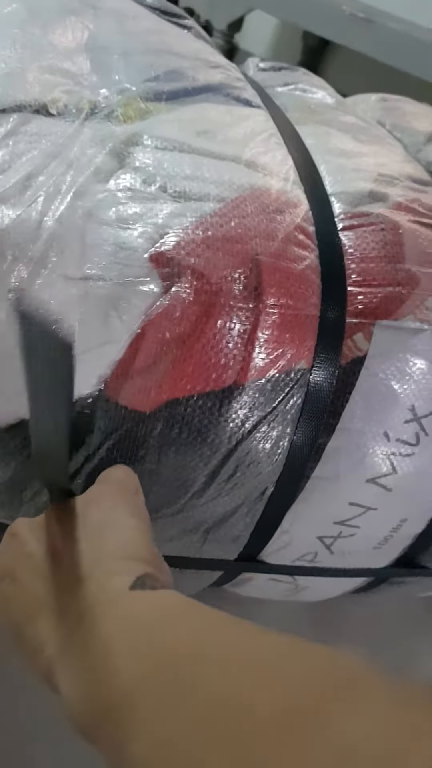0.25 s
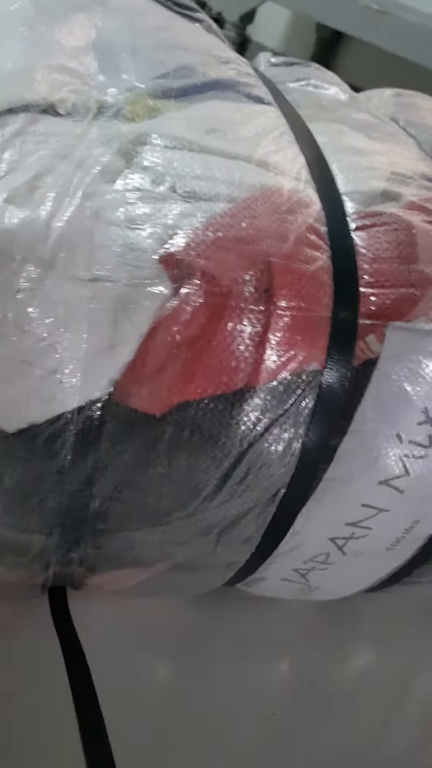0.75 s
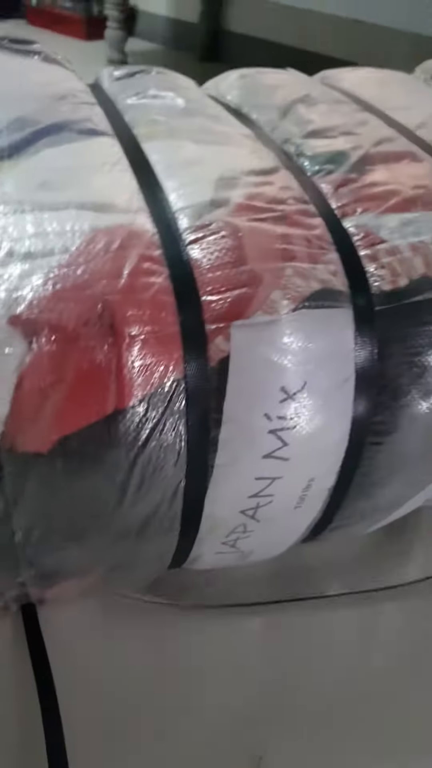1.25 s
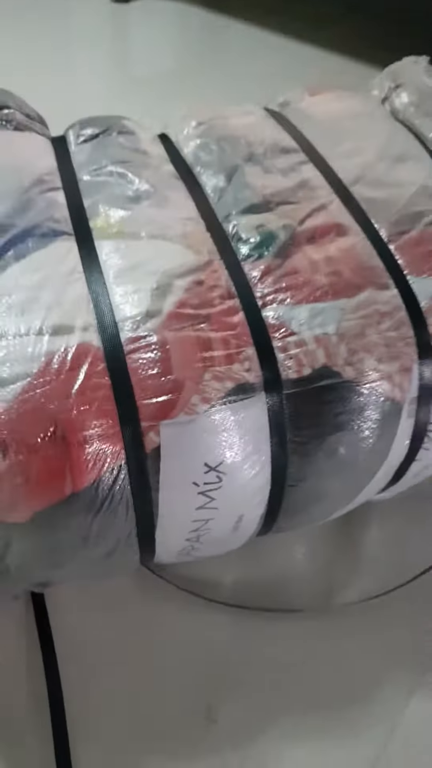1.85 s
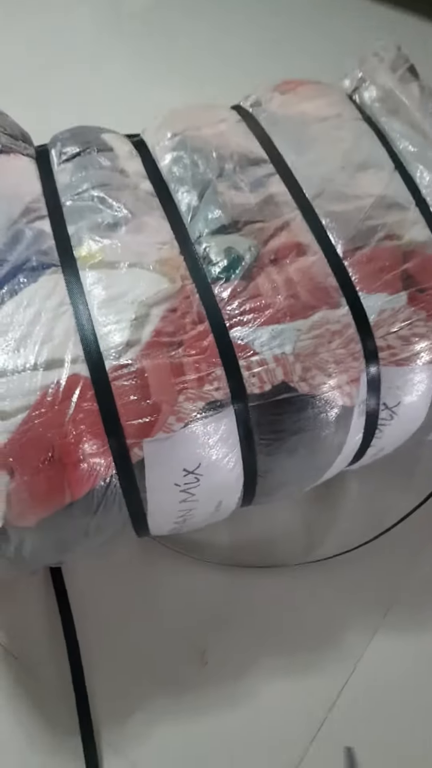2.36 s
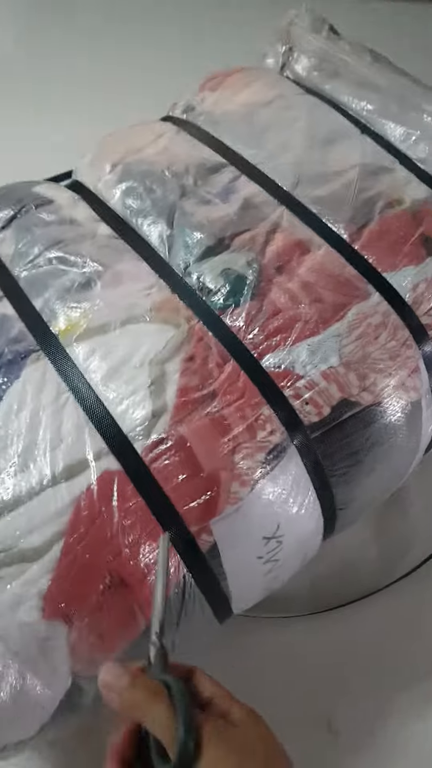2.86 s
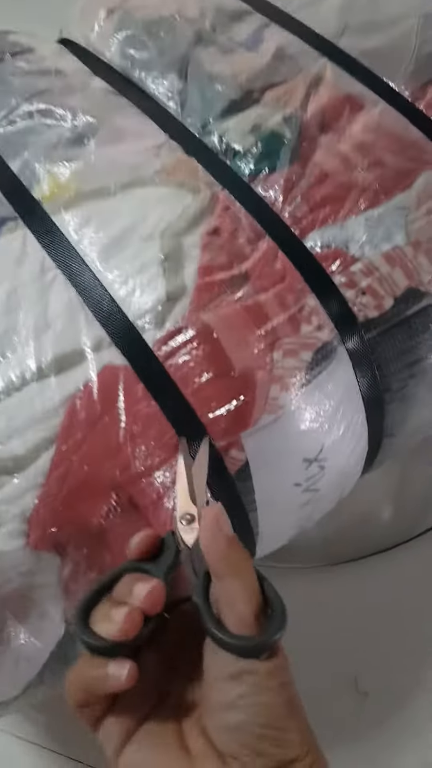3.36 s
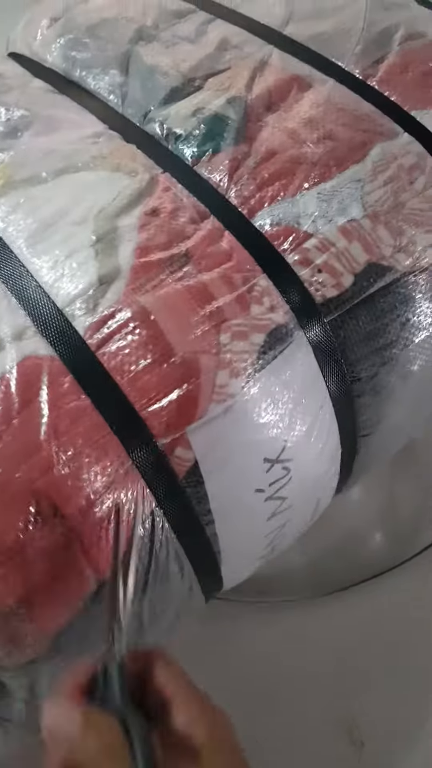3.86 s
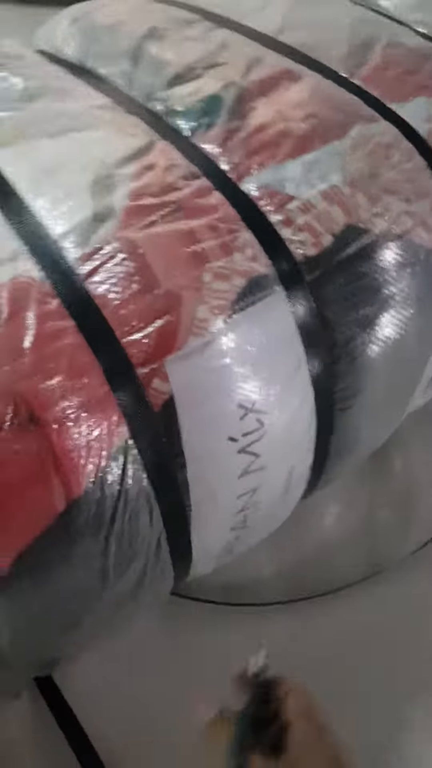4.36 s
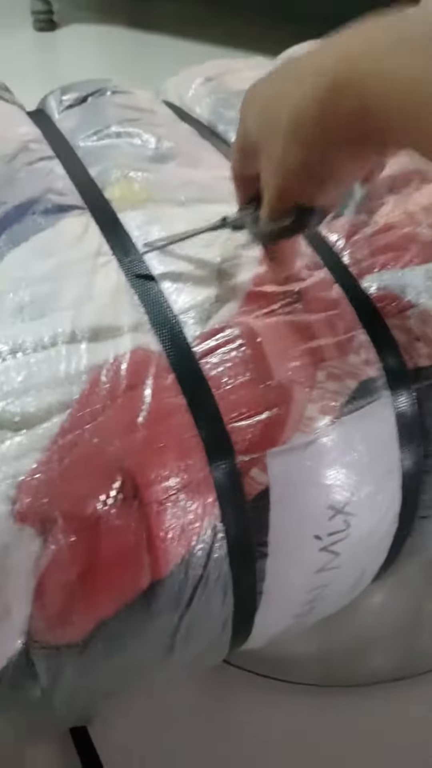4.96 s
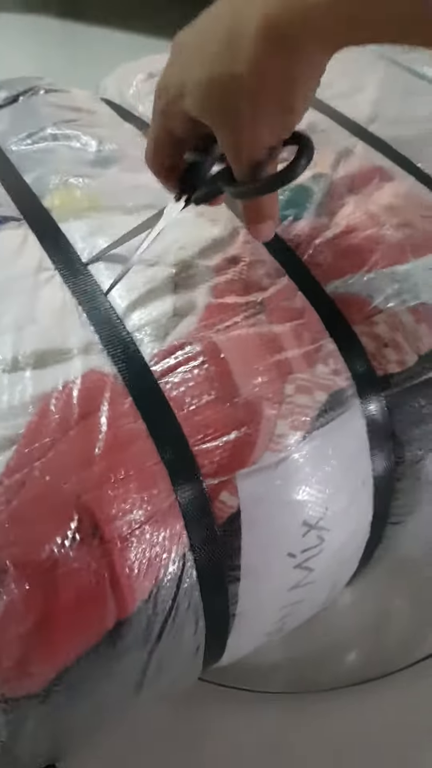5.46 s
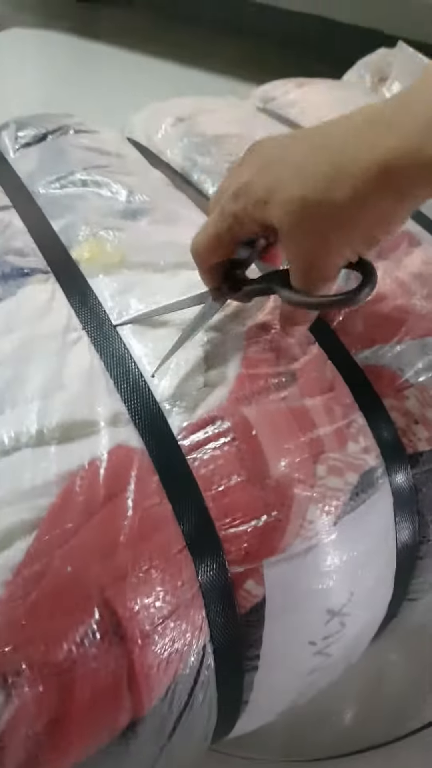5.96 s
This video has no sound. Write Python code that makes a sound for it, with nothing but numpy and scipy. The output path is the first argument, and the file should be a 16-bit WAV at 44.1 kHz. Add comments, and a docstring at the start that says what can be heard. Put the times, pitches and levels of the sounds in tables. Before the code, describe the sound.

A strap bursts off a wrapped bale with a heavy thump and slap, followed by crisp clicks, crinkly hand slides and quiet scissor snips.

```python
"""Plastic strap let go from a wrapped bale

Indoors, close to a phone: a tight strap lets go with a loud knock, a noise lash over the bale's decaying modes.
Ends slap, scissors tick and snip (banded cracks); bumps and faint rings are sines; hands slide over the film
and feet shuffle (swelling coloured noise). A hard-floored room adds a diffuse noise tail.
Behind: low rumble, wavering hums and thin bands of hiss that sink after the knock and come back."""
import sys
import numpy as np
from scipy import signal
from scipy.fft import rfft, irfft
from scipy.io import wavfile
from scipy.ndimage import uniform_filter1d

SR = 44100
rng = np.random.default_rng(int(sys.argv[2]) if len(sys.argv) > 2 else 0)


def dump_mix(stems):
    """Bounce the given channels to the path in sys.argv[1] as a 16-bit WAV at rate SR."""
    frames = np.atleast_2d(stems).T  # one column per channel
    limited = np.clip(frames, -1, 1)  # hard clip at full scale
    pcm = np.round(limited * 32767).astype(np.int16)
    wavfile.write(sys.argv[1], SR, pcm)


N = 274302
T = np.arange(N) / SR
ALIKE_HZ = 650  # both ports hear much the same below this


def undb(db):
    """Amplitude factor from dB."""
    return 10 ** (np.asarray(db) / 20)


def unit(x):
    """Scale to rms 1."""
    return x / np.sqrt(np.mean(x ** 2))


def colour(x, table):
    """Shape the spectrum by (frequency [Hz], level [dB]) points, straight over log frequency."""
    hz, db = np.transpose(table)
    f = np.arange(x.shape[-1] // 2 + 1) * SR / x.shape[-1] + 1
    gain = undb(np.interp(np.log(f), np.log(hz), db))
    return irfft(rfft(x) * gain, x.shape[-1])


def band(x, lo_hz, hi_hz, order=2):
    """Butterworth band-pass."""
    return signal.sosfilt(signal.butter(order, [lo_hz, hi_hz], "band", fs=SR, output="sos"), x)


def pair(size):
    """Noise at two ports: alike in the bass, unrelated in the treble."""
    mid, side = rng.standard_normal((2, size))
    side = signal.sosfilt(signal.butter(1, ALIKE_HZ, "high", fs=SR, output="sos"), side)
    return np.array([mid + side, mid - side]) / np.sqrt(2)


def walk(rate_hz):
    """Random levels held 1 / rate_hz and slewed twice; rms 1."""
    k = int(SR / rate_hz)
    steps = np.repeat(rng.standard_normal(N // k + 1), k)
    return unit(uniform_filter1d(uniform_filter1d(steps, k), k)[:N])


KNOCK_S, LASH_HOLD_S, LASH_FALL_DB_S, LASH_DB = .348, 0.034, 150, -10.5
SNAP_GAIN, SNAP_DECAY_S = 1.2, .0004
BOOM_DB, BOOM_RISE_S, LEAN_RAD_PER_HZ = -8.5, 0.0038, .0015
# modes of the packed bale: (frequency [Hz], level re BOOM_DB [dB], T60 [s])
BALE_MODES = [(58.6, -11, 0.45), (77, -6.5, 0.37), (99.5, -5.5, 0.57), (122.6, 1, 0.43), (148.1, -4, 0.54),
              (165, -8, 0.49), (192.7, -6, 0.1), (241.3, -18.5, 0.89), (357.6, -3, 0.32), (388, -8.5, 0.12),
              (421, -7.5, 0.46), (564, -15.5, 0.44), (740, -11.5, 0.33), (844, -17.5, 0.36),
              (1057, -17.5, 0.11)]
# spectrum of the strap's lash: (frequency [Hz], relative density [dB per Hz])
LASH_SPECTRUM = [(100, -33.5), (170, -5), (416, -7), (512, -15.5), (749, -17), (996, -13.5), (1140, -22),
                 (1660, -15), (3200, -26), (4830, -26.5), (9040, -39), (12000, -33.5), (16000, -37)]


def knock():
    """The freed strap snaps and lashes the film (first result); the packed bale booms in its modes (second)."""
    t = np.clip(T - KNOCK_S, 0, None)
    on = T >= KNOCK_S

    envelope = on * undb(-LASH_FALL_DB_S * np.clip(t - LASH_HOLD_S, 0, None))
    rattle = undb(2.0 * walk(220))
    lash = unit(colour(pair(N) * rattle, LASH_SPECTRUM)) * envelope * undb(LASH_DB)
    snap = SNAP_GAIN * band(on * np.exp(-t / SNAP_DECAY_S), 110, 14000, order=1)

    start = 2 * np.pi * rng.random(len(BALE_MODES))
    # each mode reaches one port a little ahead, its phase lead growing with frequency
    lean = LEAN_RAD_PER_HZ * rng.standard_normal(len(BALE_MODES))
    port_sign = np.array([[1], [-1]])
    boom = 0
    for (hz, db, t60), phase, skew in zip(BALE_MODES, start, lean):
        swing = np.sin(2 * np.pi * hz * t + phase + hz * skew * port_sign)
        boom = boom + undb(db - 60 * t / t60) * swing
    rise = 1 - np.exp(-t / BOOM_RISE_S)  # the body takes a moment to swing
    return lash + snap, undb(BOOM_DB) * boom * rise


# ticks, slaps and snips: (time [s], peak level at the centre [dB], centre [octaves re 1 kHz],
# fall away from it [dB per octave], left minus right [dB], decay constant [ms], room send [dB])
CLICKS = [(.1033, -31.5, 3.5, 12, -10, 1.3, -7), (0.1496, -29, 4.5, 13, -10, 0.86, -6),
          (0.157, -24, 5.5, 2, -5.5, 6, -18), (0.238, -30, 7, 4, -13, 1.5, -9),
          (.253, -27, 3.8, 12, -8, 0.55, -17), (0.315, -40, 0, 6, -5, 1.4, -16),
          (0.335, -25, -4.5, 1, -1, 5.6, -15), (0.4965, -12.5, 1, 8.5, 1, 0.82, -8),
          (0.5568, -20.5, 4, 4, 6, 1.4, -6.5), (.678, -26, 1.3, 11, 15, 0.32, -1),
          (0.718, -31.5, 4, 2.5, 9, 5.6, 1.5), (0.9353, -33.5, 1, 1.5, -2, 1.6, -23),
          (0.9531, -11.5, 5, 6, -6, 2.7, -9.5), (.962, -28.5, -.3, 11, -4, 2.5, -10),
          (0.9735, -18.5, 0, 8.5, -3.5, 2, -16.5), (1.125, -40.5, 6, 1.5, 0, 5.3, -11.5),
          (1.149, -37.5, 2.5, 5.5, -1, 2.8, -16), (1.198, -35, -2.5, 5, -1, 5.8, -21.5),
          (1.135, -45.5, -5, 5, -5, 2.5, -13), (1.2166, -44, 0.7, 2.5, 2, 1.5, -9.5),
          (1.245, -49, -.4, 6, -3, 1.87, -23), (1.398, -48, -0.1, 1.5, 0, 0.42, -10.5),
          (1.566, -46, -1, 5.5, 0.5, 2.5, -17.5), (1.584, -49, -.5, 9.5, 5, 2.6, -9.5),
          (1.6968, -45, 2, 5.5, -5.5, 0.63, -9.5), (1.7495, -25.5, 2, 8.5, -2, 1.23, -14.5),
          (2.0829, -37, 3, 4.5, 0.5, 1.26, -11.5), (2.507, -52, 0, 11, 0, 4.3, 2.5),
          (2.715, -44, -1, 6.5, 7, 5.1, -16), (2.87, -37.5, 3, 9.5, -6, .4, -13),
          (3.174, -33.5, 0.5, 17, 0, 0.71, -16), (3.1875, -37, 1.5, 8, 3, .6, -17.5),
          (3.319, -52.5, -0.5, 6.5, 6.5, 0.56, -14), (3.553, -47.5, -2.8, 5, -4, 3.4, -5),
          (3.6375, -46.5, 4.5, 5, 2.5, .6, -0.5), (3.763, -42, 8, 0.5, 2, 6.9, -2.5),
          (3.771, -26.5, 3.5, 3, 2, 1.5, -21), (3.7786, -27, 4.5, 2, 0, 0.67, -17.5),
          (3.9011, -20, 3.0, 14.5, 1, 1.4, -16.5), (4.0958, -49.5, 3, 8.5, -7, 0.57, -18.5),
          (4.133, -43.5, 3, 11.5, -4.5, 0.73, -16.5), (5.054, -49, -0.5, 1.5, 5, 2.07, -11.5),
          (5.071, -53.5, -1, 4.5, 4, 1.6, -3.5), (5.4743, -37, 1.5, 6, 3, 1.8, -8.5),
          (5.494, -51.5, -0.2, 7, 4, 1.47, -7.5), (5.678, -40, 3.5, 9.5, 19, 1.36, -22),
          (5.7162, -40.5, 3, 8.5, 12.5, .52, -18.5), (5.7984, -12.5, 4, 2.5, 0, 0.72, -14.5),
          (5.965, -29.5, 1.5, 9, 0.5, 1.4, -23.5), (6.201, -35.5, 4, 12, 4.5, 1.05, -16.5)]
# bands a crack is built from: (low edge [Hz], high edge [Hz])
CLICK_BANDS = [(200, 900), (900, 2500), (2500, 6000), (6000, 10000), (10000, 20000)]


def clicks():
    """Each a sharp crack with a short rattle behind it; returns the direct sound and the room send."""
    t = np.arange(2048) / SR
    dry, send = np.zeros((2, 2, N + len(t)))
    # alternate signs so that neighbouring bands add up where they meet
    spikes = [(-1) ** k * band(1. * (t == 0), *edges) for k, edges in enumerate(CLICK_BANDS)]
    octaves = np.log2(np.prod(CLICK_BANDS, axis=1) ** .5 / 1000)
    for s, peak_db, centre, fall_db, pan_db, ms, room_db in CLICKS:
        levels_db = peak_db - fall_db * abs(octaves - centre)
        pan = undb([[pan_db / 2], [-pan_db / 2]])
        crack = pair(len(t)) * np.exp(-t * 1000 / ms)
        crack[:, 0] = 1.0 / ms  # the shorter the contact, the more of it is one clean snap
        i = int(s * SR)
        for k, (edges, level_db, spike) in enumerate(zip(CLICK_BANDS, levels_db, spikes)):
            part = (-1) ** k * band(crack, *edges)
            part = part * undb(level_db) / abs(part).max()
            dry[:, i:i + len(t)] += part * pan
            # the walls hear the crack from all sides: same energy per band, evened-out colour
            match = np.sqrt(np.mean(part ** 2) / np.mean(spike ** 2))
            send[:, i:i + len(t)] += spike * match * undb(room_db)
    return dry[:, :N], send[:, :N]


def swells(start, end, db, rise_db_s, fall_db_s, rest_db):
    """Gain of the loudest move at each moment: ramp up, hold, ramp down, never under the resting rustle."""
    t = T[::64, None]
    ramp_up = rise_db_s * np.clip(start - t, 0, None)
    ramp_down = fall_db_s * np.clip(t - end, 0, None)
    top = np.max(db - ramp_up - ramp_down, axis=1)
    return undb(np.interp(T, t[:, 0], np.maximum(top, rest_db)))


STROKE_RISE_DB_S, STROKE_FALL_DB_S, FILM_REST_DB, AIRY_REST_DB = 328, 130, -76.5, -72.5
# hands sliding: (start [s], end [s], level [dB], airy top re that level [dB])
STROKES = [(0.0, 0, -59, -11), (0.15, .33, -56.5, 1.5), (.45, 0.624, -48.5, -3), (0.734, 0.764, -50.5, 2),
           (.82, 0.935, -56, -4), (1.09, 1.221, -67, 0.5), (1.849, 1.94, -65.5, -7.5),
           (2.179, 2.209, -71.5, 11.5), (2.478, 2.579, -61, -1.5), (2.763, 2.929, -59, 4.5),
           (3.014, 3.172, -50.5, 0.5), (3.4, 3.5, -59.5, 3.5), (3.771, 3.884, -58.5, 6),
           (4.12, 4.14, -73, 2), (4.437, 4.52, -65.5, 2), (4.698, 4.735, -69.5, 11.5),
           (4.92, 4.93, -66, -5), (5.063, 5.12, -66.5, -0.5), (5.519, 5.54, -67.5, -18.5),
           (5.682, 5.69, -64, 6.5), (5.76, 5.802, -71.5, 10), (5.897, 6.038, -67.5, 1.5),
           (6.144, 6.17, -76.5, 14)]
# spectrum of skin on film: (frequency [Hz], relative density [dB per Hz])
FILM_SPECTRUM = [(880, -47), (1500, -20.5), (1780, -21), (2690, -13), (3030, -10), (4370, -4), (7840, -10),
                 (15100, -11), (16000, -15.5)]


def slide():
    """Skin on film is a dense fizz of tiny slips: noise of jumpy level in a main and an airy band."""
    start, end, db, airy_db = np.transpose(STROKES)
    ramps = STROKE_RISE_DB_S, STROKE_FALL_DB_S
    fizz = [colour(pair(N) * undb(1.5 * rng.standard_normal(N)), FILM_SPECTRUM) for _ in range(2)]
    film = unit(band(fizz[0], 1000, 7500))
    airy = unit(band(fizz[1], 7500, 21000))
    grip = undb(1.0 * walk(60))
    hands = film * swells(start, end, db, *ramps, FILM_REST_DB)
    hands = hands + airy * swells(start, end, db + airy_db, *ramps, AIRY_REST_DB)
    return grip * hands


# dull bumps on something hollow: (time [s], level [dB], hardness as tilt about 400 Hz [dB per octave])
BUMPS = [(.958, -45.5, -9), (0.979, -49.5, -1), (1.155, -49.5, -2), (1.199, -53.5, 11.5), (1.567, -66, 5.5),
         (1.584, -66, 6), (2.72, -59.5, -3), (3.178, -49, -1), (3.771, -48, -4.5), (5.8, -48, -9.5),
         (5.966, -65, 5)]
# its modes: (nominal frequency [Hz], level re the bump [dB], T60 [s])
HOLLOW_MODES = [(225, -3.5, 0.12), (320.4, 2.5, 0.086), (570.5, -8.5, 0.093), (800, -21, 0.19)]


def bumps():
    """Soft blows ring a few short low modes, a little different each time."""
    out = np.zeros(N)
    for s, blow_db, hard in BUMPS:
        i = int(s * SR)
        t = T[:min(SR // 2, N - i)]
        chance = rng.standard_normal((len(HOLLOW_MODES), 2))
        for (hz, db, t60), (detune, spread) in zip(HOLLOW_MODES, chance):
            mode_db = blow_db + db + hard * np.log2(hz / 400) + 2.0 * spread
            tuned_hz = hz * (1 + 0.03993 * detune)
            out[i:i + len(t)] += undb(mode_db - 60 * t / t60) * np.sin(2 * np.pi * tuned_hz * t)
    return out


SHIFT_RISE_DB_S, SHIFT_FALL_DB_S, SHIFT_REST_DB = 601, 115, -77
SHIFT_PEAK_DB, SHIFT_WIDTH_OCT = 5, .9
# feet and cloth shifting: (start [s], end [s], level [dB], frequency that stands out [Hz])
SHIFTS = [(0.0, -0.01, -57.5, 1500), (0.133, 0.297, -57.5, 1220), (0.337, 0.61, -52, 1273),
          (0.71, .75, -59, 1620), (0.854, .93, -61, 900), (0.954, 0.994, -59, 800),
          (1.044, 1.169, -63, 685), (1.207, 1.241, -71, 700), (1.556, 1.64, -72, 800),
          (1.851, 2.05, -72, 700), (2.15, 2.203, -71, 800), (2.527, 2.58, -65.5, 1600),
          (2.735, 2.764, -55, 954), (2.934, 2.96, -73, 895), (3.191, 3.195, -66.5, 600),
          (3.456, 3.56, -69.5, 996), (3.768, 3.776, -64, 913), (4.41, 4.522, -75, 2560),
          (4.71, 4.744, -76.5, 1490), (4.91, 4.921, -68.5, 983), (5.052, 5.078, -69.5, 1300),
          (5.475, 5.532, -72, 1307), (5.67, 5.768, -71, 1155), (5.926, 5.946, -71.5, 1500)]
# spectrum of the shuffle: (frequency [Hz], relative density [dB per Hz])
SHUFFLE_SPECTRUM = [(250, -27.5), (500, -2.5), (900, -6.5), (1500, -6.5), (2200, -6.5), (2800, -12),
                    (5000, -45)]


def shifts():
    """Feet and cloth are dull and gritty; each move catches fast, has its own colour and fades."""
    feet = unit(colour(pair(N) * undb(2.0 * walk(300)), SHUFFLE_SPECTRUM))
    out = feet * undb(SHIFT_REST_DB)
    edge = 2 ** (SHIFT_WIDTH_OCT / 2)
    for start, end, db, hz in SHIFTS:
        near = slice(max(int((start - .1) * SR), 0), int((end + .4) * SR))
        t = T[near]
        peak = band(feet[:, near], hz / edge, hz * edge)
        grit = unit(feet[:, near] + undb(SHIFT_PEAK_DB) * peak)
        ramp_up = SHIFT_RISE_DB_S * np.clip(start - t, 0, None)
        ramp_down = SHIFT_FALL_DB_S * np.clip(t - end, 0, None)
        out[:, near] += grit * undb(db - ramp_up - ramp_down)
    return out


# faint thin tones after a touch: (time [s], frequency [Hz], glide [Hz per s], level [dB], length [s])
RINGS = [(3.19, 582, 46.5, -63, .1), (3.273, 4400, 45.5, -57.5, .015), (5.09, 12050, -6000, -62, 0.034),
         (5.101, 3800, 49, -71, 0.068), (5.475, 1312, 51.5, -62.5, 0.038), (5.958, 552, 800, -59.5, 0.082)]


def rings():
    """Gliding sines: each starts at once, holds, then dies away quickly."""
    out = np.zeros(N)
    for s, hz, glide, db, length in RINGS:
        t = np.clip(T - s, 0, length)
        envelope = np.sqrt(np.cos(np.pi / 2 * t / length).clip(0)) * (t < length)
        out += undb(db) * envelope * np.sin(2 * np.pi * (hz + glide * t / 2) * t)
    return out


ROOM_GAP_S = 0.0074
# decay of the room: (frequency [Hz], T60 [s])
ROOM_DECAY = [(60, 0.49), (300, 0.87), (1500, 0.38), (4000, 0.55), (8000, 0.34), (14000, 0.15)]


def room(x):
    """Diffuse noise tail, each half octave dying at its own rate."""
    t = np.arange(SR) / SR
    hz, t60 = np.transpose(ROOM_DECAY)
    noise, tail = pair(SR), 0
    for f in 40 * 2 ** np.arange(0, 9, .5):
        decay = undb(-60 * t / np.interp(np.log(f), np.log(hz), t60))
        tail = tail + band(noise, f / 2 ** 0.21, f * 2 ** 0.21) * decay
    tail *= np.clip(t / ROOM_GAP_S, 0, 1) ** 2  # builds up as the first walls answer
    return signal.fftconvolve(x.mean(0, keepdims=True), tail / 8, axes=1)[:, :N]


RUMBLE_LEVEL_DB, RUMBLE_WAVER_DB, HUM_WAVER_DB, HISS_WAVER_DB = -59, 1.7, 2.2, .6
# spectrum of the rumble: (frequency [Hz], relative density [dB per Hz])
RUMBLE_SPECTRUM = [(12, -41), (20, -11), (134, -5), (262, -11.5), (319, -16), (472, -21), (558, -30),
                   (624, -28.5), (825, -38), (2530, -52), (4060, -49), (6540, -62), (7730, -33),
                   (16000, -57)]
# hums: (frequency [Hz], width [Hz], level [dB])
HUMS = [(69.5, 27, -66), (131, 7, -64), (155, 6, -72), (185, 9.3, -66.5)]
# hiss bands: (frequency [Hz], width [Hz])
HISS_BANDS = [(4250, 600), (7850, 650), (10400, 1300)]
# their levels, in the same order: (level [dB])
HISS_LEVELS = [-83.5, -72.5, -72]
# course of the whole background: (time [s], gain [dB])
BACKGROUND_COURSE = [(0, 3), (.35, 6), (.9, 0), (1.3, -23), (1.6, -16.5), (1.9, -1), (2.4, -1.5), (3, 0.5),
                     (4.5, 2), (5.7, 2), (6.2, 1.5)]


def background():
    """Low rumble, wavering hums and thin bands of hiss far up: filtered noise sharing one level course."""
    rumble_db = RUMBLE_LEVEL_DB + RUMBLE_WAVER_DB * walk(1.9)
    out = unit(colour(pair(N), RUMBLE_SPECTRUM)) * undb(rumble_db)
    hums = [(*hum, HUM_WAVER_DB) for hum in HUMS]
    hisses = [(*hiss, db, HISS_WAVER_DB) for hiss, db in zip(HISS_BANDS, HISS_LEVELS)]
    for hz, width, db, waver_db in hums + hisses:
        tone = unit(band(pair(N), hz - width / 2, hz + width / 2))
        out = out + tone * undb(db + waver_db * walk(4.7))
    return out * undb(np.interp(T, *np.transpose(BACKGROUND_COURSE)))


def scene():
    """Sum of all sources; clicks, knock and bumps also feed the room."""
    dry, send = clicks()
    bang, boom = knock()
    dull = bumps()
    wet = room(send + undb(-26.5) * bang + undb(-36.5) * boom + undb(-12.5) * dull)
    return dry + bang + boom + dull + wet + slide() + shifts() + rings() + background()


TOP_HZ = 15900


def record(dry):
    """The phone rounds the loudest peaks (tanh) and cuts the top (steep low-pass)."""
    rounded = np.tanh(1.048 * dry) / 1.236
    return signal.sosfilt(signal.ellip(10, .2, 80, TOP_HZ, fs=SR, output="sos"), rounded)


dry = scene()
out = record(dry)
dump_mix(out)
```